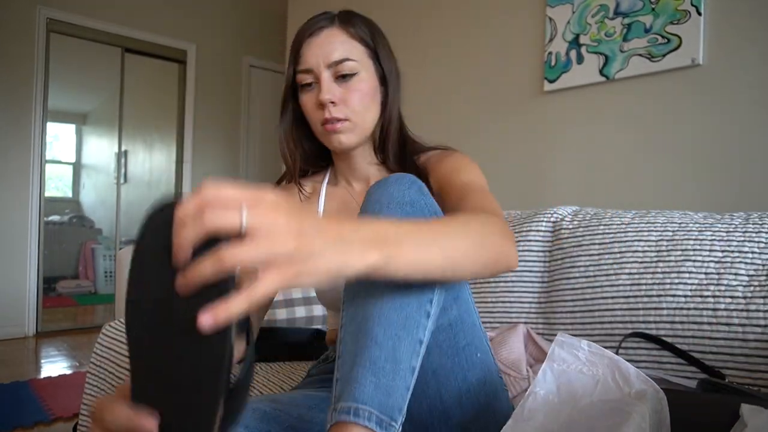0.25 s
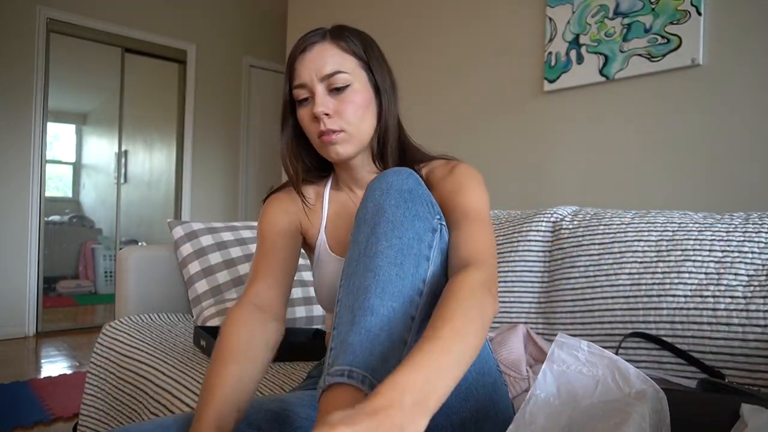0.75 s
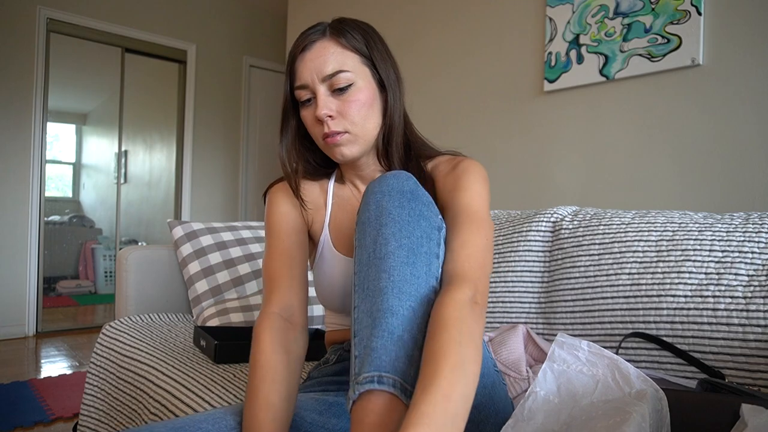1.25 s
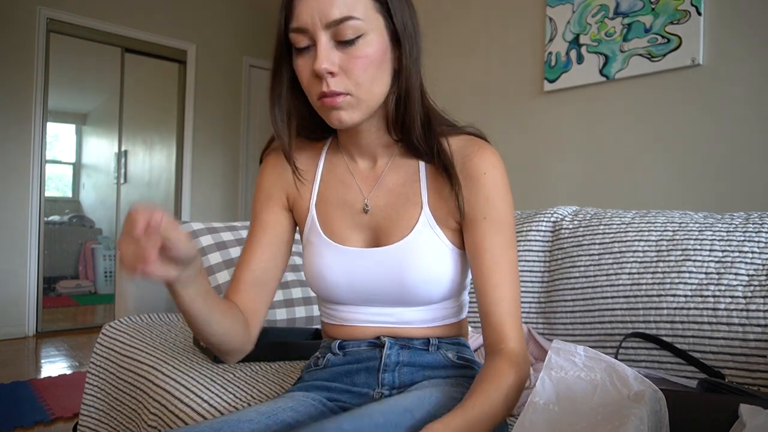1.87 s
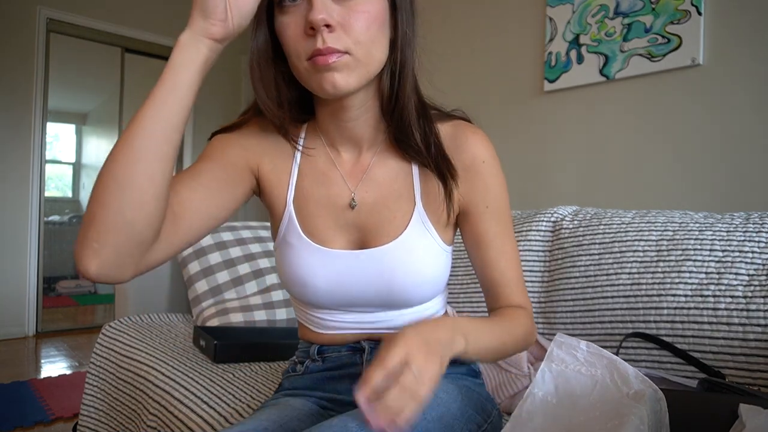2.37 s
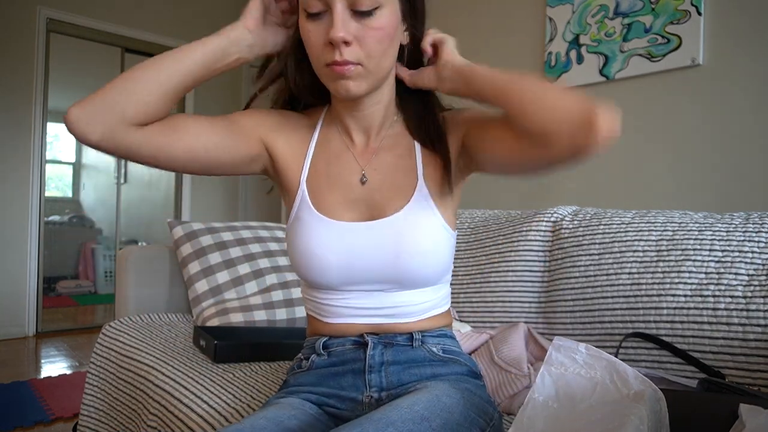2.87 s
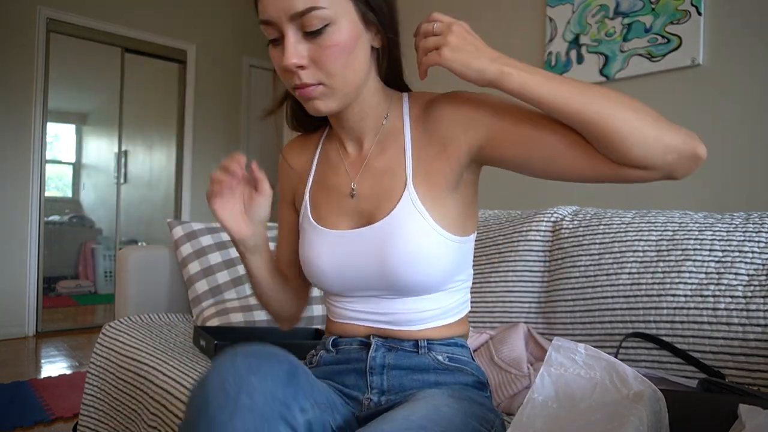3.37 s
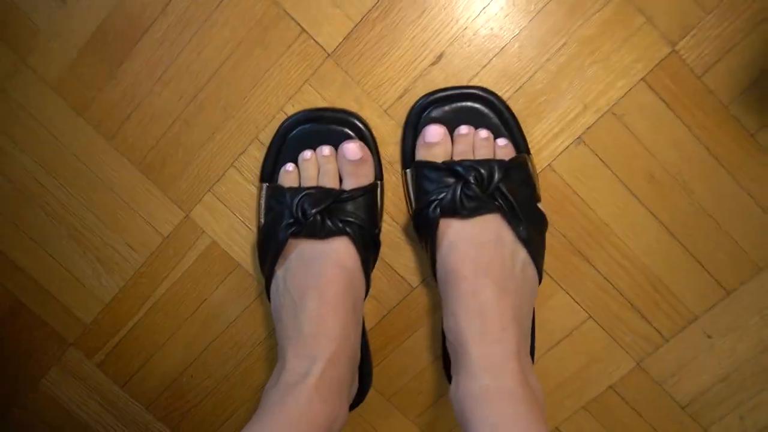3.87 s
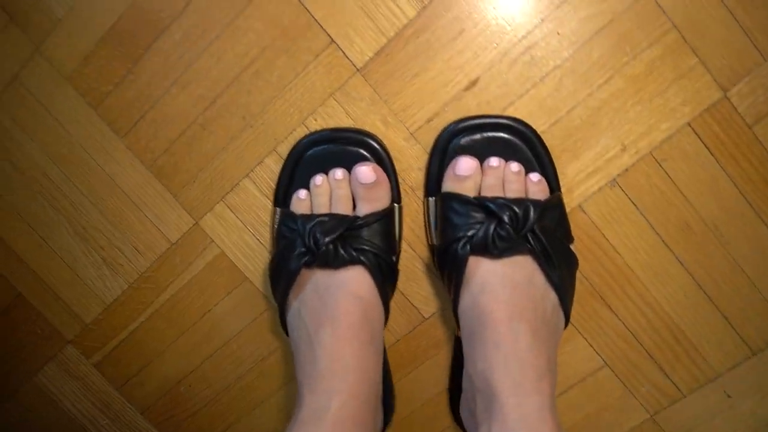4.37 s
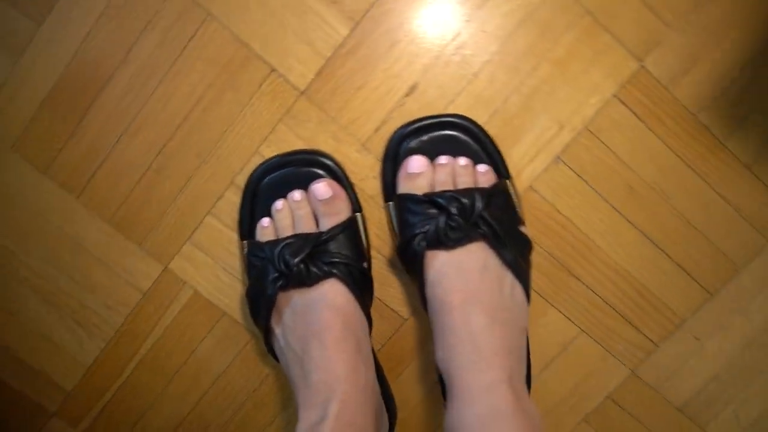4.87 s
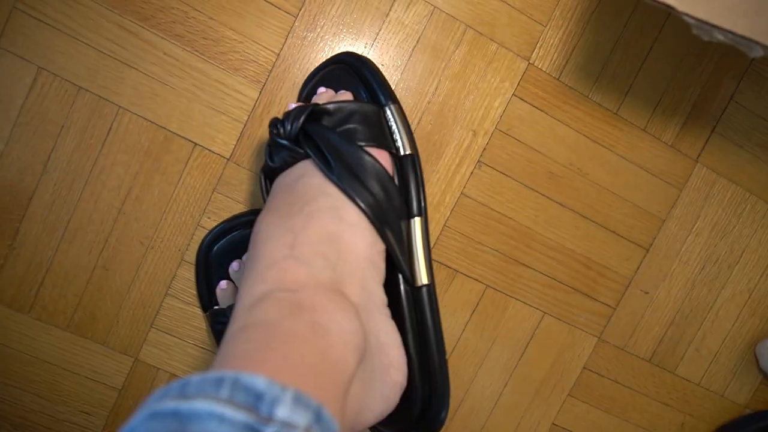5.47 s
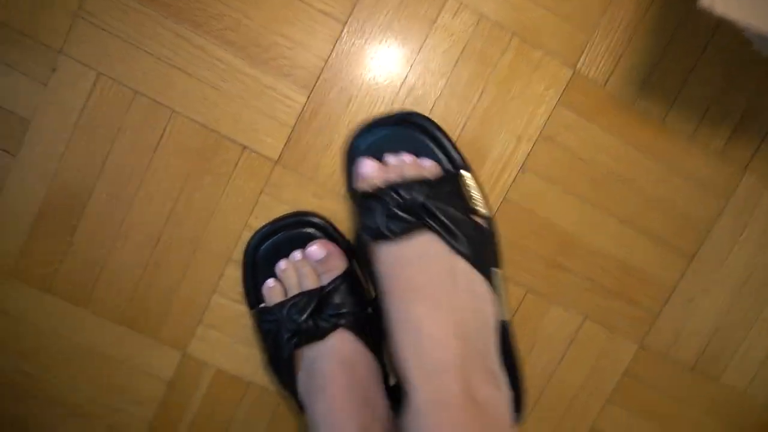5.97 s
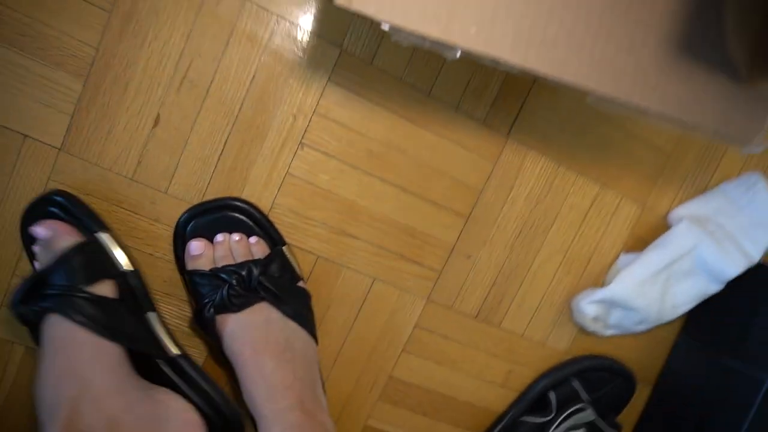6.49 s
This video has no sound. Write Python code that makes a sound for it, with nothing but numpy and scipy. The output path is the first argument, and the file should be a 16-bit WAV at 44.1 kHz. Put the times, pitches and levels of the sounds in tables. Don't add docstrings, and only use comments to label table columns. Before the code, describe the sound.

Leather and cloth rub and tick, a hard sole clack lands, sofa springs groan, then low camera-handling thuds dominate with faint sandal scuffs and slaps on wood.

```python
import sys
import numpy as np
from scipy import signal
from scipy.fft import rfft, irfft, next_fast_len
from scipy.io import wavfile
from scipy.ndimage import uniform_filter1d

SR = 44100
rng = np.random.default_rng(int(sys.argv[2]) if len(sys.argv) > 2 else 0)


def nominal_scale(level):
    x = np.asarray(level, float) / 20
    return 10 ** x


def to_wav(sig):
    pcm = np.clip(np.atleast_2d(sig), -1, 1) * 32767
    pcm = np.round(pcm).astype(np.int16)
    wavfile.write(sys.argv[1], SR, pcm.T)


N = 296793
CUT_S = 3.859
LAG_S = 0.00091

# (peak time [s], pressure [dB], rise [s], fall [s], depth of the rubbed body [dB])
BRUSHES = [(.078, -31.5, 0.052, 0.082, -8), (.443, -40.5, 0.027, 0.13, -22),
           (.788, -26.5, 0.071, 0.15, -12), (1.03, -30, 0.078, 0.046, -3.5),
           (1.306, -24.5, 0.021, 0.044, -9), (1.357, -20, 0.018, 0.017, -23),
           (1.39, -26.5, 0.035, 0.11, -8), (1.559, -26, 0.028, 0.018, -25), (2.407, -37, 0.25, 0.14, 5.5),
           (2.678, -28, 0.032, 0.038, -3.5), (3.033, -39, .09, 0.11, 3.5), (3.502, -27.5, 0.063, 0.19, 1.5),
           (3.68, -34.5, .03, .1, 7.5), (3.73, -25.5, 0.074, 0.51, -0.5), (4.236, -40, 0.098, 0.13, -3.5),
           (4.432, -39.5, 0.1, 0.059, -5.5), (4.548, -44, 0.087, 0.1, -18), (4.971, -30, 0.058, 0.056, -6),
           (5.075, -33.5, 0.031, 0.12, -5), (5.521, -46.5, 0.94, 0.095, -2.5),
           (5.972, -43.5, 0.17, 0.038, -9), (6.019, -39.5, 0.0063, 0.013, 6),
           (6.411, -30, 0.097, 0.019, 2.5), (6.599, -38.5, 0.4, 0.38, -3.5)]
# (peak time [s], pressure [dB], rise [s], fall [s], depth of the rubbed body [dB])
DRAGS = [(.64, -33, 0.037, 0.66, -35), (1.149, -28.5, 0.042, 0.034, -12), (1.791, -21, 0.0016, 0.019, 3),
         (1.822, -23, 0.0087, 0.025, 5), (1.835, -19.5, 0.014, .05, 1), (1.85, -13.5, 0.005, 0.079, 1),
         (1.94, -26.5, 0.058, 0.21, 1.5), (2.188, -39.5, .012, 0.13, 8.5), (2.523, -33, 0.0092, 0.11, 3),
         (2.757, -32, 0.02, 0.087, 0.5), (3.293, -33.5, 0.077, 0.15, 4), (3.854, -21, 0.11, 0.016, 1.5),
         (4.85, -45, 0.085, 0.4, 1), (5.208, -30, 0.0013, 0.016, 5.5), (5.235, -41, .011, 0.19, 5),
         (6.152, -39, 0.018, 0.037, 7.5), (6.185, -28.5, 0.053, 0.023, 1), (6.461, -36.5, 0.031, 0.05, 5.5)]
# (grain level [dB], body level [dB], fibre level [dB])
FIDGET_DB = [
    (-45.5, -43, -51),
    (-56.5, -54, -75),
]
# (frequency [Hz], level [dB])
BODY = [(260, -12), (450, -5.5), (595, -8.5), (644, -7.5), (776, -4.5), (1110, -0.5), (2500, -8.5),
        (3250, -14), (5500, -120)]
# (frequency [Hz], level [dB])
GRAIN = [(1290, -14), (2200, -6), (2730, -3.5), (3040, -4), (3540, -0.5), (4420, 0.5), (5940, -4),
         (6590, -6.5), (8000, -5.5), (10400, -23), (17600, -120)]
# (frequency [Hz], level [dB])
FIBRE = [(4500, -66), (7000, -5.5), (8000, -3.5), (10500, 2), (13000, 0), (15500, -9), (16500, -36)]


def rubbing():
    brush_fine_db, drag_fine_db = -4.5, -12.5
    shares = [[0, row[-1], brush_fine_db] for row in BRUSHES]
    shares += [[0, row[-1], drag_fine_db] for row in DRAGS]
    rows = [row[:-1] for row in [*BRUSHES, *DRAGS]]
    grain, body, fibre = strokes(rows, shares, FIDGET_DB)

    slip_sizes = nominal_scale(1.8 * np.minimum(rng.exponential(1, N), 4))
    slips = (rng.random(N) < 9000 / SR) * slip_sizes
    drive = evened(slips * rng.standard_normal(N)) + 1.14 * rng.standard_normal(N)
    clumps_db = 0.63 * wander(per_s=60) + 1.32 * wander(per_s=230)
    drive = patchy(drive * nominal_scale(clumps_db), patch_db=1.5)

    out = nominal_scale(-5.5) * body * coloured(drive, BODY)
    out += nominal_scale(-5.0) * grain * coloured(drive, GRAIN)
    out += nominal_scale(-5.5) * fibre * coloured(drive, FIBRE)
    return out


# (time [s], peak level [dB], low ring [Hz], high ring [Hz], snap level [dB])
KNOCKS = [(1.139, -15, 940, 1530, -10.5), (1.598, -23, 560, 1000, -42), (1.7897, -9.5, 460, 1670, -11),
          (1.824, 6.5, 640, 1230, -12.5), (1.9605, -10, 544, 1370, -18), (2.1814, -10, 438, 1700, -26),
          (2.1857, -6, 414, 1250, -20.5), (2.196, -16, 1150, 1710, -36), (2.2939, -10, 1520, 2300, -24),
          (2.2992, -11.5, 502, 1010, -23), (2.4055, -12.5, 613, 1750, -17.5), (2.478, -19, 455, 1260, -19),
          (2.521, -9, 484, 1090, -20), (3.357, -16, 870, 1170, -23.5), (3.367, -9.5, 447, 860, -26),
          (3.488, -17, 800, 1670, -35), (3.597, -20.5, 560, 1100, -19), (3.78, -1.1, 474, 1180, -13),
          (5.2033, 1, 830, 1640, -21.5), (5.2036, -12.5, 383, 2110, -30), (5.209, -2, 1770, 2020, -30),
          (5.972, -32, 510, 850, -30), (5.986, -36, 446, 790, -30), (6.203, -32, 503, 910, -30),
          (6.233, -23, 710, 1010, -13.5), (6.288, -22.5, 1150, 1900, -25), (6.6726, -10, 730, 1300, -24),
          (6.704, -26, 1500, 2600, -20)]


def knocks():
    out = np.zeros(N)
    for s, db, low_hz, high_hz, snap_db in KNOCKS:
        decay_cycles = 5.5 * (1.5 - 0.056 * db)
        t60 = decay_cycles / low_hz
        noise = rng.standard_normal(600)
        add(out, s + LAG_S, nominal_scale(db - 2.5) * ring(low_hz, 0.75 * t60))
        add(out, s + LAG_S, -nominal_scale(db - 4.0) * ring(high_hz, 0.82 * t60))
        add(out, s + LAG_S, nominal_scale(db + snap_db + 11.5) * snap(noise, low_hz=1370, high_hz=4170, t60=0.007))
    return out


# (time [s], peak level [dB], pitch [Hz], crackle level [dB])
TICKS = [(0.0372, -15, 3730, -18), (0.481, -22, 2880, -8), (0.766, -22, 7000, -10), (0.881, -14, 4330, -20),
         (0.8932, -12, 3600, -21), (0.9185, -13.5, 1610, -8), (0.929, -12, 1540, -27),
         (0.963, -18, 2000, -25), (0.971, -17, 1500, -22), (0.988, -21, 1300, -20), (1.003, -21, 1900, -18),
         (1.043, -16, 1400, -11), (1.2534, -21.5, 4170, 1.5), (1.3624, -8.5, 3630, -1.5),
         (1.4654, -20.5, 5160, -8), (1.8128, -17, 6000, -8), (1.8344, -10, 5500, -8),
         (1.8488, -5, 1150, -18), (1.854, -8, 2300, -20), (1.8603, -3, 1120, -16), (1.8672, -10, 2400, -22),
         (1.891, -13, 2800, -20), (1.96, -7, 3250, -13), (2.2242, -19, 2900, -4), (2.5197, -10, 4070, -13),
         (2.5207, -14, 7000, -24), (2.66, -24, 8000, -4), (2.685, -23, 7970, -10), (2.7447, -11, 3260, -9),
         (2.7583, -15, 5030, -8), (3.028, -14, 5640, -14), (3.04, -19.5, 2720, -10),
         (3.3783, -30.5, 3730, 3.5), (3.415, -21, 1500, -25), (3.598, -16, 7000, -12),
         (3.766, -16, 7500, -2), (3.779, -7, 2160, -25), (3.7924, -15, 7900, -8), (3.8555, -4, 2650, -12.5)]


def ticks():
    return releases(TICKS, t60=0.0039)


# (time [s], peak level [dB], pitch [Hz], crackle level [dB])
PEELS = [(4.2242, -30.5, 4150, -4), (4.282, -33, 10900, -2), (4.436, -37, 2220, -11),
         (4.956, -22, 2000, -10), (4.977, -19.5, 7550, -2), (5.0004, -23, 2530, -2),
         (5.008, -26.5, 900, -4), (5.204, -16, 2800, -28), (5.2158, -17.5, 3130, -13),
         (5.514, -31, 3000, -7), (5.53, -33.5, 3000, -1.5), (5.7272, -26.5, 1870, -5.5),
         (5.7325, -34, 2010, -4.5), (6.02, -31, 2400, -1.5), (6.142, -16, 1240, -22),
         (6.151, -18, 1300, -26), (6.1828, -27, 3920, -20), (6.341, -23, 2580, -9), (6.3998, -16, 7600, -7),
         (6.4172, -12, 4100, -7), (6.557, -34, 8000, -1), (6.574, -27, 6040, -15), (6.612, -27.5, 6000, -7),
         (6.6482, -17.5, 2680, -20), (6.677, -28, 3180, -9)]


def peels():
    return releases(PEELS, t60=0.008)


def releases(rows, t60):
    out = np.zeros(N)
    for s, db, hz, crackle_db in rows:
        crackle = snap(rng.standard_normal(400), low_hz=3000, high_hz=11000, t60=t60)
        add(out, s + LAG_S, nominal_scale(db - 1.5) * ring(hz, t60))
        add(out, s + LAG_S, nominal_scale(db + crackle_db + 7.5) * crackle)
    return out


# (middle time [s], peak level [dB], pitch [Hz], length [cycles])
PATS = [(.548, -33, 480, 4), (.8795, -22, 4300, 3), (.8925, -18, 5000, 3), (.935, -30, 1600, 8),
        (.9615, -28, 900, 2.5), (.981, -26, 1500, 2.5), (.9885, -27, 800, 2.5), (.9965, -27, 1700, 3),
        (1.0097, -26, 2000, 2.5), (1.0158, -26, 1200, 2.5), (1.043, -30, 450, 3), (1.255, -32, 800, 3),
        (1.358, -14, 5000, 3), (1.39, -30, 600, 5), (1.42, -30, 700, 6), (1.4665, -26, 12000, 8),
        (1.6, -28, 420, 3), (1.792, -9, 1900, 4), (1.8565, -10, 1300, 3), (1.875, -13, 2400, 4),
        (1.894, -14, 1800, 3), (1.902, -16, 1300, 3), (1.913, -17, 1500, 3), (1.964, -15, 650, 2.5),
        (2.2, -22, 1700, 9), (2.76, -30, 1200, 5), (3.818, -16, 1150, 9), (5.2205, -25, 1700, 6),
        (5.233, -30, 1850, 9), (6.2045, -30, 800, 3), (6.2895, -24, 1200, 3), (6.418, -26, 1300, 3),
        (6.657, -33, 2800, 6), (6.662, -34, 2900, 6), (6.7057, -22, 1800, 5), (6.418, -9, 4800, 4),
        (3.853, -14, 2800, 6), (6.7055, -32, 4600, 12)]


def pats():
    out = np.zeros(N)
    for s, db, hz, cycles in PATS:
        length = cycles / hz
        u = np.linspace(0, 1, int(length * SR))
        swell = np.sin(np.pi * u ** 0.8) ** 2
        add(out, s - length / 2, nominal_scale(db) * swell * np.sin(2 * np.pi * cycles * u))
    return out


# (time [s], length [s], level [dB], pitch [Hz], glide [factor])
SQUEAKS = [(4.71, .06, -44, 370, 1.02), (6.018, .03, -30, 215, 1.02), (.79, .05, -40, 290, 1.1),
           (6.47, .05, -44, 1000, .7), (6.44, 0.045, -35, 1130, 1.13), (3.495, 0.12, -29.5, 1262, 1.03),
           (3.802, 0.033, -23, 1110, 0.96), (4.15, 0.18, -41, 148, 1.22), (5.075, 0.065, -41, 968, 0.98),
           (5.125, 0.084, -40, 726, 0.69), (6.673, 0.0036, -13.5, 487, 1.1)]


def squeaks():
    out = np.zeros(N)
    for s, length, db, hz, glide in SQUEAKS:
        tone = resonance(length, hz, glide, width_hz=7.9 + 0.06 * hz)
        add(out, s, nominal_scale(db) * tone * skewed_swell(len(tone), skew=0.77, roundness=1.6))
    return out


# (time [s], length [s], level [dB], centre [Hz], width [Hz])
SWISHES = [(0.751, 0.049, -33, 1342, 700), (0.76, .04, -36, 2500, 1200), (2.197, 0.82, -48, 2300, 260),
           (2.22, 0.8, -41.5, 890, 240), (3.685, 0.1, -28, 2200, 900), (4.19, 0.21, -46, 12000, 3600),
           (4.227, 0.13, -50, 4340, 500), (4.307, 0.18, -43.5, 7600, 1200), (4.333, 0.11, -53, 12000, 2500),
           (4.397, 0.12, -53, 5400, 800), (2.654, 0.05, -36.5, 7950, 905), (4.37, 0.13, -48, 9860, 1500),
           (4.517, 0.11, -50, 5320, 1120), (4.518, 0.088, -51, 7700, 1800), (5.206, 0.07, -43, 1800, 450),
           (5.27, .12, -50, 1750, 600), (5.235, 0.09, -46, 3200, 500), (6.159, 0.054, -37, 3870, 800),
           (6.385, 0.036, -38, 4400, 800), (6.44, 0.043, -39, 763, 299), (1.845, 0.06, -28, 1252, 700),
           (2.19, .085, -39, 1750, 350), (2.2, .05, -36, 1157, 300), (0, .33, -46, 717.5, 400),
           (2.64, 0.07, -39, 2290, 490), (6.098, 0.029, -43, 2030, 1200), (4.856, 0.18, -46, 1900, 700),
           (6.348, 0.083, -35, 7800, 1400), (6.009, 0.042, -33.5, 336, 345),
           (6.305, 0.11, -33.5, 9900, 2600), (6.574, 0.047, -39.5, 3150, 700),
           (6.575, 0.036, -36.5, 11800, 2000)]


def swishes():
    out = np.zeros(N)
    clumps = wander(per_s=170)
    for s, length, db, hz, width_hz in SWISHES:
        hiss = resonance(length, hz, 1, width_hz)
        swell = skewed_swell(len(hiss), skew=0.85, roundness=0.85)
        grain = nominal_scale(1.5 * clumps[round(s * SR):][:len(hiss)])
        add(out, s, nominal_scale(db) * hiss * swell * grain)
    return out


def resonance(length, hz, glide, width_hz):
    size = min(int(length * SR), SR // 2 + SR // 3)
    carrier = np.exp(2j * np.pi * np.cumsum(np.linspace(hz, hz * glide, size)) / SR)
    r = np.exp(-np.pi * width_hz / SR)
    noise = rng.standard_normal((2, SR))
    drift = signal.lfilter([1], [1, -2 * r, r * r], noise)[:, -size:]
    return evened((carrier * (drift[0] + 1j * drift[1])).real)


def skewed_swell(size, skew, roundness):
    return abs(np.sin(np.pi * np.linspace(0, 1, size) ** skew)) ** roundness


# (time [s], length [s], level [dB], pitch [Hz], glide [factor])
GROANS = [
    (2.23, .048, -17, 122, 1.2),
    (2.245, .05, -27, 200, 1.4),
    (2.278, .06, -18, 90, 1.8),
    (2.33, .045, -25, 185, 1.03),
    (2.365, .05, -26, 165, .95),
    (2.405, .04, -25, 160, 1.5),
]


def groans():
    out = np.zeros(N)
    for s, length, db, hz, glide in GROANS:
        u = np.linspace(0, 1, int(length * SR))
        phase = 2 * np.pi * np.cumsum(hz * glide ** u) / SR
        tone = np.sin(phase) + nominal_scale(-14) * np.sin(2 * phase)
        add(out, s, nominal_scale(db + 3) * np.sin(np.pi * u ** 0.8) ** 0.9 * tone)
    return out


def handling():
    travel = 0.92
    return travel * np.tanh((lurches() + jolts() + drone()) / travel)


# (peak time [s], sway level [dB], rise [s], fall [s], shaking of the housing against the sway [dB])
LURCHES = [(.07, -44, .05, 0.15, -15), (.29, -49, .05, 0.07, -1), (.45, -27.5, 0.044, 0.2, -10),
           (.8, -49, 0.065, .6, 7), (1.3, -48, 0.4, 0.092, -8), (1.48, -28.5, 0.29, 0.032, -13),
           (2.04, -20.5, 0.24, 0.49, -12.5), (2.32, -33.5, 0.22, 0.29, 6.5), (2.6, -26.5, 0.25, 0.69, -9),
           (2.82, -35, .2, .07, -8), (3.2, -32.5, 0.037, 0.21, -4), (3.51, -31.5, 0.06, 0.35, -3.5),
           (3.8, -44, .3, 0.092, 3), (3.93, -11.5, 0.98, 0.66, -23), (4.42, -14, 0.17, 0.18, -8),
           (4.68, -8, 0.075, 0.099, -13.5), (4.731, 0, 0.094, 0.05, -24), (5.148, -8, 0.36, 0.042, -12.5),
           (5.34, -7.5, 0.32, 0.066, -17), (5.529, -18, 0.079, 0.071, -5), (6.022, -8.5, 0.17, 0.34, -8),
           (6.14, -1, 0.13, 0.095, -29), (5.75, -17.5, 0.3, .15, -21), (6.5, -6, 0.07, 0.13, -28)]
# (sway level [dB], shaking level [dB], drone level [dB])
STILL_DB = [
    (-58, -39.5, -43),
    (-21, -31, -42.5),
]
# (frequency [Hz], level [dB])
SWAY_COLOUR = [(2, -11), (6, 0), (11, 3.5), (17, 0.5), (24, -9), (33, -17), (42, -40), (60, -77)]
# (frequency [Hz], level [dB])
SHAKE_COLOUR = [(15, -68), (26, 5.5), (40, -0.5), (60, -1), (82, -1.5), (100, -26), (130, -69.5)]


def lurches():
    rows = [row[:-1] for row in LURCHES]
    shares = [[0, row[-1]] for row in LURCHES]
    sway, shake = strokes(rows, shares, [row[:-1] for row in STILL_DB])
    sway_noise = steadied(coloured(rng.standard_normal(N), SWAY_COLOUR), per_s=1.8)
    shake_noise = steadied(coloured(rng.standard_normal(N), SHAKE_COLOUR), per_s=19.0)
    return nominal_scale(-2.0) * sway * sway_noise + nominal_scale(2.0) * shake * shake_noise


# (time [s], peak level [dB], housing ring [Hz], decay t60 [s])
JOLTS = [(4.131, -12, 63.3, 0.4), (4.374, -9, 63.3, 0.17), (4.43, -1.5, 73.4, 0.18), (4.651, 1, 72.3, 0.2),
         (4.868, -1.5, 59, 0.19), (4.96, -11, 76, .15), (5.144, -8, 70.4, .15), (5.936, -4, 74, .2),
         (5.019, -2, 45.4, 0.092), (5.55, -7, 68.4, 0.071), (5.808, -7, 47.3, 0.068),
         (6.0205, 9, 74.5, 0.11), (6.017, 4, 42, .06), (5.19, -10, 95, .12), (6.7, -6, 34, .15),
         (4.42, -6, 36, .1)]


def jolts():
    out = np.zeros(N)
    for s, db, hz, t60 in JOLTS:
        add(out, s, nominal_scale(db - 4.5) * ring(hz, t60, rise_cycles=0.61))
    return signal.lfilter(*signal.butter(2, 120, fs=SR), out)


# (peak time [s], level [dB], rise [s], fall [s])
LOADS = [(.3, -43.5, .45, 0.49), (.8, -38.5, 0.11, 1), (1.48, -40, 0.21, 0.44), (2.28, -31, 0.1, 0.35),
         (2.87, -42, 0.17, 0.53), (3.17, -33.5, 0.81, 0.5), (3.51, -36, 0.067, 0.5),
         (3.8, -23.5, 0.032, 0.12), (3.87, -48, .05, 0.079), (5.18, -36.5, 0.033, 0.23),
         (6.02, -39, 0.24, 0.055), (6.73, -33, 0.062, .1)]
# (frequency [Hz], level [dB])
DRONE_COLOUR = [(59, -61), (100, -8.5), (124, -10), (151, -10), (215, -8), (247, -6.5), (307, -16),
                (345, -19), (450, -23), (580, -21.5), (990, -120)]


def drone():
    level, = strokes(LOADS, np.zeros((len(LOADS), 1)), [row[-1:] for row in STILL_DB])
    flutter = nominal_scale(0.13 * wander(per_s=28))
    return level * flutter * steadied(coloured(rng.standard_normal(N), DRONE_COLOUR), per_s=9.8)


# (frequency [Hz], decay t60 [s])
ROOM = [(250, 1), (1000, 0.19), (2500, 0.75), (6000, 0.41), (14000, 0.16)]


def room(x):
    taps = np.zeros(SR)
    at = np.arange(200, SR - 20, 20)
    taps[at + rng.integers(0, 20, len(at))] = rng.choice([-1., 1.], len(at))
    hz, t, z = signal.stft(taps, SR, nperseg=256)
    decay = nominal_scale(-60 * t / read(ROOM, hz)[:, None])
    tail = signal.istft(z * decay, SR, nperseg=256)[1]
    return signal.fftconvolve(x, tail / np.linalg.norm(tail))[:N]


# (frequency [Hz], level [dB])
AIR = [(180, -9), (300, -8), (432, -28), (664, -4), (810, -11.5), (1230, -14.5), (1620, -13), (1760, -22),
       (1920, -34), (2010, -6), (2220, -28), (15700, -31.5)]
# (frequency [Hz], level [dB])
MURMUR = [(180, -43), (300, -12), (388, -9.5), (560, -12), (900, -17.5), (1170, -53), (1980, -120)]


def still_air(by_sofa):
    air = nominal_scale(-51.5 - 2.0) * coloured(rng.standard_normal(N), AIR)
    murmur = nominal_scale(-42 - 5.5) * coloured(rng.standard_normal(N), MURMUR)
    return air + murmur * by_sofa


def strokes(rows, gains_db, rest_db):
    slope_db = 12
    t = np.arange(0, N + 32, 32) / SR
    rest_sofa, rest_floor = [np.array(levels)[:, None] for levels in rest_db]
    power = nominal_scale(np.where(t < CUT_S, rest_sofa, rest_floor)) ** 2
    for (s, db, rise, fall), gains in zip(rows, gains_db):
        shape_db = db - slope_db * np.maximum((s - t) / rise, (t - s) / fall)
        same_place = (t < CUT_S) == (s < CUT_S)
        power = power + nominal_scale(shape_db + np.array(gains)[:, None]) ** 2 * same_place
    return [np.interp(np.arange(N) / SR, t, np.sqrt(p)) for p in power]


def ring(hz, t60, rise_cycles=1 / 4):
    t = np.arange(int(1.2 * t60 * SR) + 8) / SR
    rise = np.minimum(hz * t / rise_cycles, 1)
    return rise * nominal_scale(-60 * t / t60) * np.sin(2 * np.pi * hz * t)


def snap(noise, low_hz, high_hz, t60):
    burst = noise * nominal_scale(-60 * np.arange(len(noise)) / SR / t60)
    burst = signal.lfilter(*signal.butter(2, [low_hz, high_hz], "band", fs=SR), burst)
    return burst / abs(burst).max()


def coloured(x, colour):
    size = next_fast_len(len(x))
    gain = nominal_scale(read(colour, np.fft.rfftfreq(size, 1 / SR)))
    return evened(irfft(rfft(x, size) * gain, size)[:len(x)])


def patchy(x, patch_db):
    z = signal.stft(x, nperseg=512, noverlap=384)[2]
    patches = uniform_filter1d(rng.standard_normal(z.shape), 11, 0)
    patches = evened(uniform_filter1d(patches, 8, 1))
    return evened(signal.istft(z * nominal_scale(patch_db * patches), nperseg=512, noverlap=384)[1][:N])


def wander(per_s):
    span = max(int(SR / per_s), 1)
    return evened(uniform_filter1d(uniform_filter1d(rng.standard_normal(N), span), span))


def steadied(x, per_s):
    span = int(SR / per_s)
    power = uniform_filter1d(uniform_filter1d(x ** 2, span), span)
    return evened(x / np.sqrt(power + 0.054))


def evened(x):
    return x / np.sqrt(np.mean(x ** 2) + 1e-20)


def read(points, hz):
    f, value = np.transpose(points)
    return np.interp(np.log(hz + 1), np.log(f + 1), value)


def add(mix, s, sound):
    part = mix[max(round(s * SR), 0):][:len(sound)]
    part += sound[:len(part)]


def scene():
    hits = knocks() + ticks() + peels() + pats()
    rub = rubbing() + squeaks() + swishes() + groans()
    by_sofa = np.arange(N) < CUT_S * SR
    wet = nominal_scale(-14.0) * hits + nominal_scale(-17.5) * rub
    tail = room(wet * by_sofa) * by_sofa + room(wet * ~by_sofa)
    return (hits + rub + tail + handling() + still_air(by_sofa))[None]


def band_limit(x):
    return signal.sosfilt(signal.butter(12, 16920, fs=SR, output="sos"), x)


def record(dry):
    knee = 0.95
    over = np.maximum(abs(dry) - knee, 0)
    bent = (1 - knee) * np.tanh(over / (1 - knee))
    held = np.sign(dry) * (np.minimum(abs(dry), knee) + bent)
    band_edge = signal.firwin(255, 15750, window=("kaiser", 7), fs=SR)
    mix = signal.oaconvolve(held, band_edge[None], "same")
    return band_limit(mix)


dry = scene()
out = record(dry)
to_wav(out)
```